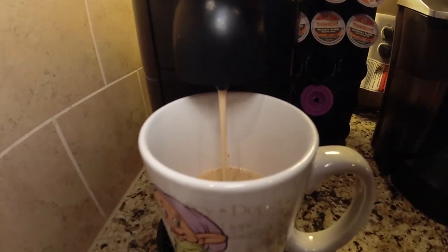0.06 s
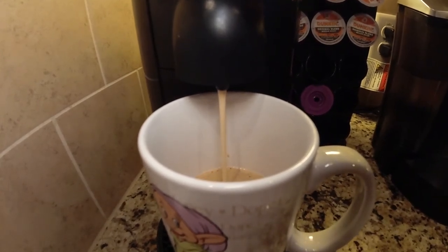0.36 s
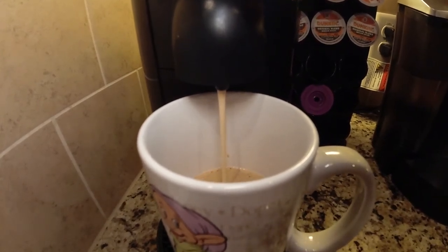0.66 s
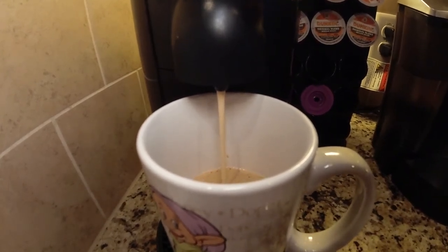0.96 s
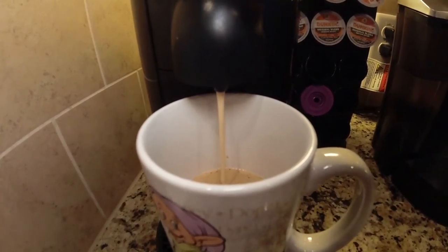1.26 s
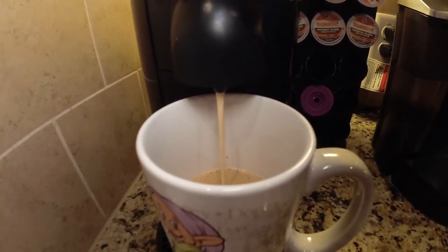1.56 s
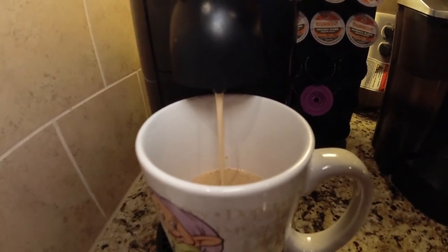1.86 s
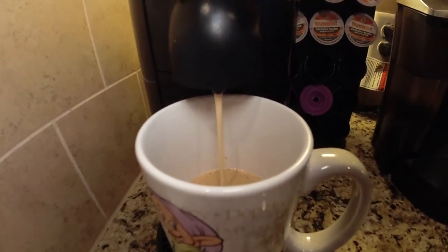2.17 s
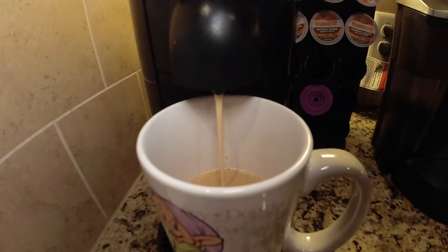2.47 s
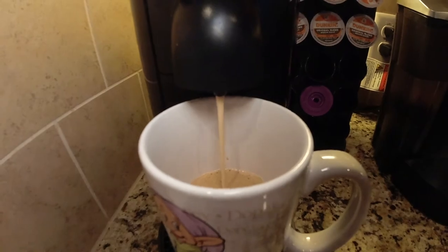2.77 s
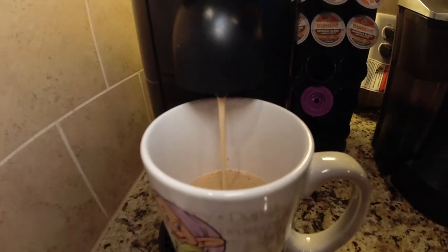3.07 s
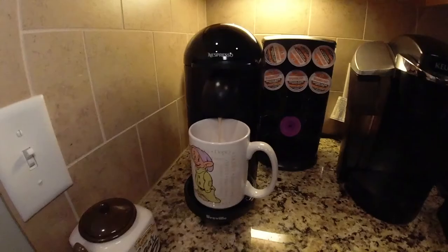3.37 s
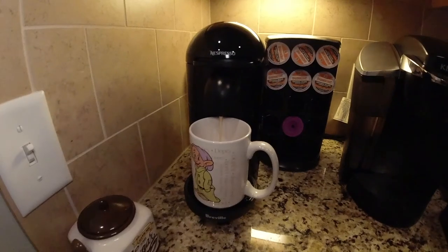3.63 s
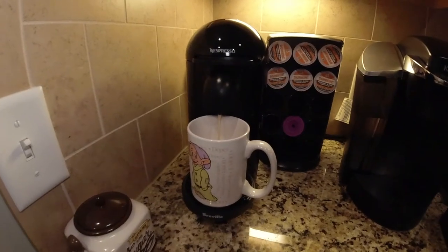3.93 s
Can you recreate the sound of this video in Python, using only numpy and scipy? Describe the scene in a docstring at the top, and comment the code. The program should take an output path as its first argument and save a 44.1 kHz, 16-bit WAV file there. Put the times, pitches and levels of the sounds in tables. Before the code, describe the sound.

A coffee machine hums and whirs close by, hissing coffee into a mug.

```python
"""First a capsule coffee machine runs close by: its spinning rotor whines and beats against mains hum,
stirred air whirs, and a thin stream of coffee hisses onto foam in a mug.
Near two seconds a faint squeal rises, while the whole sound slowly grows.
After a brief silence at about 3.4 s the machine is farther off.
Last, the hand-held microphone is bumped and its plastic case clicks."""
import sys
import numpy as np
from scipy import signal
from scipy.fft import rfft, irfft
from scipy.io import wavfile

SR = 44100
rng = np.random.default_rng(int(sys.argv[2]) if len(sys.argv) > 2 else 0)


def file_out(sig):
    """Save sig as 16-bit WAV at sys.argv[1]."""
    # one column per channel
    cols = np.atleast_2d(sig).T
    # limit, then scale
    lim = np.clip(cols, -1, 1)
    pcm = np.round(lim * 32767).astype(np.int16)
    wavfile.write(sys.argv[1], SR, pcm)


N = 176400
TIME = np.arange(N) / SR
NEAR_END_S, FAR_START_S, FADE_S = 3.426, 3.563, 0.012

# how fast the rotor spins: t/s, speed/(turns per second)
ROTOR_SPEED = [(0, 62.81), (.35, 62.66), (.5, 62.85), (.85, 62.62), (1.05, 62.83), (1.4, 62.63),
               (1.85, 62.68), (2.3, 62.56), (2.5, 62.66), (3.2, 62.57), (4, 62.6)]
# rotor tones, close by (before the swell) and farther off: multiple of the speed, level/dB
ROTOR_NEAR = [(2, -63), (3, -50.5), (4, -58.5), (5, -66), (6, -63.5), (7, -56.5), (8, -61.5), (9, -59.5),
              (10, -63.5), (12, -67.5), (14, -70.5), (17, -67), (18, -67.5), (21, -68), (24, -63.5),
              (26, -84), (32, -69.5), (34, -76), (35, -74.5), (36, -70.5), (37, -66.5), (43, -72),
              (44, -73.5), (47, -75), (48, -83), (49, -74.5)]
ROTOR_FAR = [(3, -62.5), (5, -73), (6, -71), (7, -84), (8, -67), (9, -61.5), (10, -72), (14, -73),
             (16, -59.5), (17, -63.5), (24, -74)]
# how loud the main whine and the thin whistle are over time: t/s, level/dB
WHINE_LEVEL = [(0, -49.5), (1.55, -50.5), (2, -46.5), (2.6, -47.5), (3.2, -45), (3.4, -46.5)]
WHISTLE_LEVEL = [(0, -69), (1.85, -67), (1.98, -64.5), (2.25, -62), (2.33, -73), (2.52, -65), (2.68, -66),
                 (2.83, -63.5), (3.22, -63), (3.35, -68)]
# electric hum before the swell: multiple of the mains, added multiple of the rotor speed, level/dB
HUM_TONES = [(1, 0, -56), (2, 0, -56.5), (3, 0, -57), (4, 0, -67), (5, 0, -61), (6, 0, -63), (7, 0, -63),
             (8, 0, -66), (2, 1, -65), (2, 2, -61), (3, 2, -68), (6, 1, -67)]
# steady tones of the housing before the swell: f/Hz, level/dB
HOUSING_TONES = [(195.2, -60), (235, -67), (312.6, -69), (370, -67), (586, -61)]
# hollow spaces that colour the whir, before the swell: f/Hz, width/Hz, level/dB
AIR_HOLLOWS = [(1848, 130, -60), (988, 29, -64.5), (4480, 25, -75), (8980, 70, -85), (11000, 25, -90),
               (14040, 45, -97.5)]
# the colour of each noise, from low to high pitch: f/Hz, relative level/dB
RUMBLE_COLOUR = [(5, -1.5), (32, -3), (48, -17), (75, -29), (200, -52), (1000, -100)]
KITCHEN_COLOUR = [(60, -4), (130, 7), (220, -3), (320, -17.5), (480, -1.5), (600, -1), (800, -10.5),
                  (1050, -3), (1250, -12.5), (1550, -10), (2500, -16), (4200, -20.5), (6100, -21),
                  (9000, -31), (11000, -40), (15000, -49)]
WHIR_COLOUR = [(60, -3.5), (100, -6.5), (220, -3.5), (330, -7), (410, 4), (600, -4), (950, -2.5),
               (1250, -6), (1650, -7.5), (2200, -12.5), (3200, -18.5), (6000, -20), (16000, -50)]
POUR_COLOUR = [(500, -13), (2000, -1), (3400, 1), (4000, -1), (5200, 1), (6300, 2), (7300, -3.5),
               (9000, -8.5), (9600, -12.5), (12000, -19.5), (14000, -21), (16000, -27)]
FINGER_RUB_COLOUR = [(40, -2), (75, 25), (110, -7), (160, -8), (220, -17), (290, -24), (700, -46)]
SNAP_COLOUR = [(300, -35), (1200, -12.5), (1800, 0), (3500, -5), (5200, -4.5), (6100, 5), (7300, -12),
               (8600, -4), (10200, -24.5), (12000, -16), (13500, -35), (16000, -46)]
# bumps on the microphone: t/s, deep wobble level/dB, case ring level/dB
MIC_BUMPS = [(3.682, -9, -35), (3.736, -30, -41), (3.763, -23, -61), (3.838, -9.5, -61),
             (3.899, -6.5, -40.5), (3.947, -27, -28.5)]
# plastic clicks: t/s, ring f/Hz, ring level/dB, snap level/dB
CASE_CLICKS = [(3.7158, 3080, -33, -65), (3.9063, 2990, -35.5, -55), (3.9496, 2820, -18.5, -26),
               (3.9594, 2920, -32, -56), (3.9968, 2630, -21, -32.5)]


def amp(db):
    """Turns decibels into a number to multiply by."""
    return 10 ** (np.asarray(db) / 20)


def unit(x):
    """Scales a sound to an average (rms) strength of 1."""
    return x / np.sqrt(np.mean(x ** 2) + 1e-20)


def curve(points):
    """Joins (time, value) points by straight lines."""
    return np.interp(TIME, *np.transpose(points))


def swell(db_per_s):
    """A slowly growing gain that passes 1 halfway through the close-by part."""
    return amp(db_per_s * (TIME - NEAR_END_S / 2))


def shaped(gain):
    """Noise whose strength at each frequency f follows gain(f)."""
    return unit(irfft(rfft(rng.standard_normal(N)) * gain(np.fft.rfftfreq(N, 1 / SR)), N))


def noise(colour):
    """Noise that follows a colour table."""
    hz, db = np.transpose(colour)
    return shaped(lambda f: amp(np.interp(np.log(f + 1), np.log(hz), db)))


def band(hz, width_hz, steepness=4):
    """Noise gathered around one frequency."""
    return shaped(lambda f: 1 / (1 + ((f - hz) / width_hz) ** steepness))


def wander(rate_hz):
    """Random movement, up to about this fast."""
    return band(0, rate_hz)


def tone(cycles, db):
    """A pure tone that starts at a random point in its wave."""
    return np.sqrt(2) * amp(db) * np.sin(2 * np.pi * (cycles + rng.random()))


def knock(start, rise_s, t60):
    """The loudness of a knock: a rounded rise, and a fall of 60 dB every t60 seconds."""
    age = np.maximum(TIME - start, 0)
    return (1 - np.exp(-(age / rise_s) ** 2)) * amp(np.maximum(-60 * age / t60, -200))


def ring(start, hz, rise_s, t60):
    """A struck part rings at one pitch and dies away."""
    return knock(start, rise_s, t60) * np.sin(2 * np.pi * hz * (TIME - start))


def rumble(db):
    """A deep rumble under everything else."""
    return amp(db) * noise(RUMBLE_COLOUR)


def kitchen():
    """The steady noise of the room."""
    return amp(-54.5) * noise(KITCHEN_COLOUR) + rumble(db=-51)


def bumps(wobble_hz=23.74, case_hz=200.3):
    """Each nudge of the hand rocks the microphone, rubs its case and makes it ring."""
    rub = amp(-26.5) * noise(FINGER_RUB_COLOUR)
    case_shape = dict(rise_s=0.0058, t60=0.18)
    out = np.zeros(N)
    for start, wobble_db, case_db in MIC_BUMPS:
        wobble = ring(start, wobble_hz, rise_s=0.014, t60=0.29)
        out += amp(wobble_db) * (wobble + rub * knock(start, **case_shape))
        out += amp(case_db) * ring(start, case_hz, **case_shape)
    return out


def clicks(echo_db=-23):
    """Plastic snaps with a short ring and a faint echo from the tiles."""
    snap_noise, echo_noise = noise(SNAP_COLOUR), noise(SNAP_COLOUR)
    out = np.zeros(N)
    for start, hz, ring_db, snap_db in CASE_CLICKS:
        snap = snap_noise * knock(start, rise_s=1 / SR, t60=0.01)
        echo = amp(echo_db) * echo_noise * knock(start, rise_s=0.0029, t60=0.23)
        out += amp(ring_db) * ring(start, hz, rise_s=0.0011, t60=0.014)
        out += amp(snap_db) * (snap + echo)
    return out


def foam(count=600, low_hz=3194, high_hz=9230, decay_cycles=90):
    """Tiny bubbles of many sizes ring briefly in the foam."""
    age = np.arange(2048) / SR
    out = np.zeros(N + len(age))
    for when, pitch, strength in rng.random((count, 3)):
        octaves = pitch * np.log2(high_hz / low_hz)
        cycles = low_hz * 2 ** octaves * age
        gain = amp(4 * strength - 5 * octaves)  # higher bubbles are quieter
        bubble = np.sin(2 * np.pi * cycles) * np.exp(-cycles / decay_cycles)
        out[int(when * N):][:len(age)] += gain * bubble
    return amp(-68.5) * unit(out[:N])


def squeal(start_s=1.76, length_s=0.32, first_hz=3300, last_hz=3680):
    """One faint, fuzzy squeal rises and levels off, probably air in the spout."""
    progress = np.clip((TIME - start_s) / length_s, 0, 1)
    hz = first_hz + (last_hz - first_hz) * np.sin(np.pi * progress / 2)
    fade = np.sqrt(abs(np.sin(np.pi * progress)))
    return tone(np.cumsum(hz) / SR, db=-65) * wander(rate_hz=45) * fade


def whistle():
    """A thin, breathy whistle comes and goes with the flow."""
    return amp(curve(WHISTLE_LEVEL)) * band(hz=4320, width_hz=62, steepness=2)


def pour():
    """Coffee sprays inside the machine and runs onto foam: a fine, even hiss."""
    flicker_db = 0.5 * wander(rate_hz=13)
    grain_db = -0.43 * wander(rate_hz=500)
    return noise(POUR_COLOUR) * amp(-57 + flicker_db + grain_db) * swell(db_per_s=0.6)


def whir(turns):
    """Air stirred by the rotor pulses with each turn and sounds the hollows of the machine."""
    air = amp(-50.5) * noise(WHIR_COLOUR)
    for hz, width_hz, db in AIR_HOLLOWS:
        air += amp(db + 0.5 * wander(rate_hz=18)) * band(hz, width_hz)
    pulse = 1 + 0.076 * (np.cos(2 * np.pi * turns) + np.cos(4 * np.pi * turns))
    flicker_db = 0.92 * wander(rate_hz=25)
    return air * pulse * amp(flicker_db) * swell(db_per_s=0.85)


def hum(turns, mains_hz=60):
    """The motor hums with the mains, some tones shifted by its spin; the housing drones along."""
    electric = sum(tone(round(mains) * mains_hz * TIME + round(spin) * turns, db)
                   for mains, spin, db in HUM_TONES)
    housing = sum(tone(hz * TIME, db) for hz, db in HOUSING_TONES)
    return electric + housing


def rotor(turns, tones, flutter):
    """The rotor sings at multiples of its speed, each tone fluttering in strength."""
    return sum(tone(round(multiple) * turns, db) * (1 + flutter * wander(rate_hz=11.6))
               for multiple, db in tones)


def whine(turns, cycles_per_turn=16):
    """The strongest rotor tone slowly grows, with a slight quaver in level and pitch."""
    cycles = cycles_per_turn * turns
    quaver = sum(wander(rate_hz=22) * wave(2 * np.pi * cycles) for wave in (np.sin, np.cos))
    return tone(cycles, curve(WHINE_LEVEL)) + amp(-63.5) * quaver


def motor(turns):
    """The motor from close by: tones, hum, a high buzz and the whine grow as the cup fills."""
    tones = (rotor(turns, ROTOR_NEAR, flutter=0.29) + hum(turns)) * swell(db_per_s=0.7)
    buzz_tones = [(multiple, -79.5) for multiple in range(19, 51)]
    buzz = rotor(turns, buzz_tones, flutter=0.46) * swell(db_per_s=2.5)
    return tones + buzz + whine(turns)


def scene():
    """The machine close by, a short silence, then the machine from farther off."""
    speed = curve(ROTOR_SPEED) + 0.064 * wander(rate_hz=10.4)
    turns = np.cumsum(speed) / SR  # turns made so far
    coffee = foam() + squeal() + whistle() + pour()
    near = rumble(db=-42.5) * swell(db_per_s=1) + coffee + whir(turns) + motor(turns)
    far = kitchen() + bumps() + clicks() + rotor(turns, ROTOR_FAR, flutter=0.2)
    fade_out = np.clip((NEAR_END_S - TIME) / FADE_S, 0, 1)
    fade_in = np.clip((TIME - FAR_START_S) / FADE_S, 0, 1)
    return (near * fade_out + far * fade_in)[None]


def record(dry, top_hz=15720):
    """Takes away the very highest treble."""
    low_pass = signal.firwin(767, top_hz, window=("kaiser", 9), fs=SR)
    return signal.oaconvolve(dry, low_pass[None], "same")


dry = scene()
out = record(dry)
file_out(out)
```